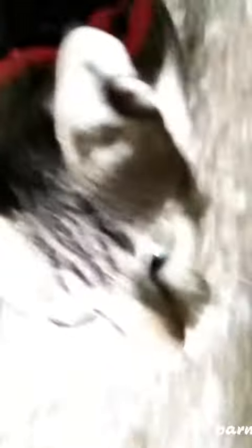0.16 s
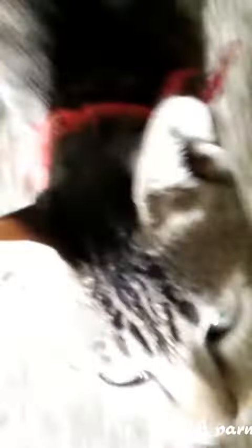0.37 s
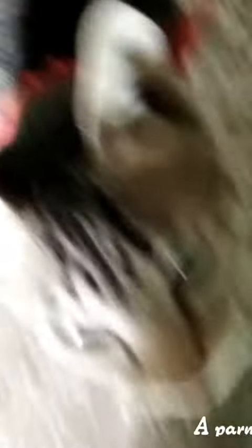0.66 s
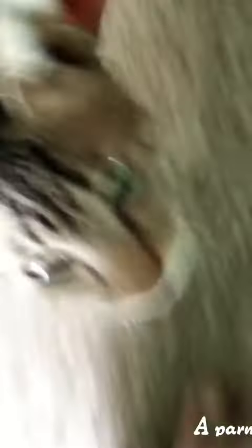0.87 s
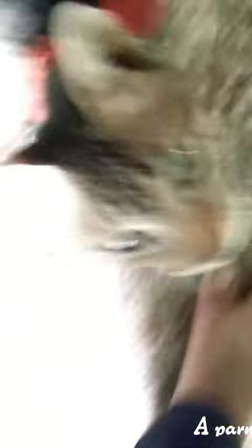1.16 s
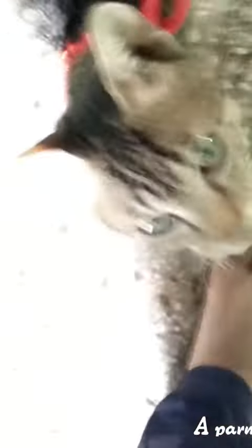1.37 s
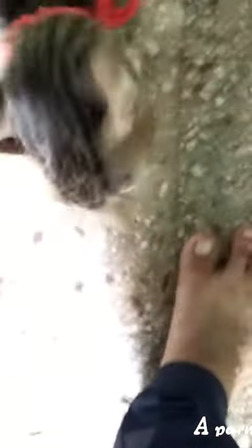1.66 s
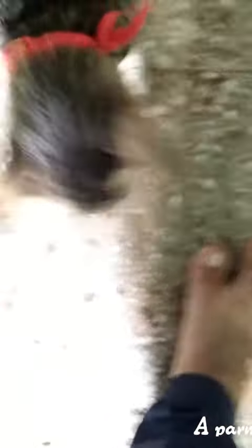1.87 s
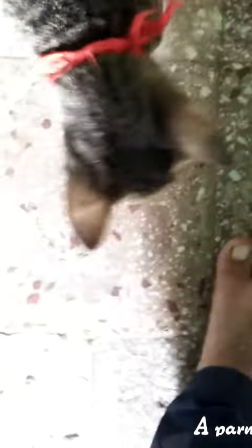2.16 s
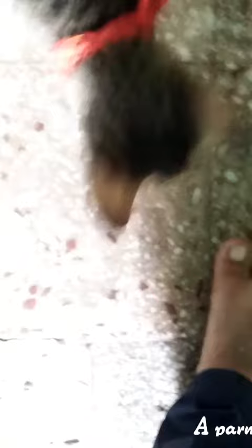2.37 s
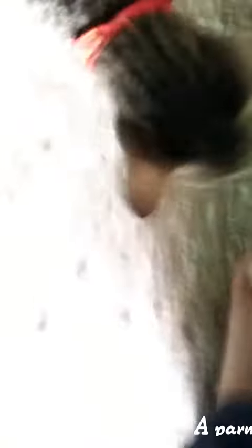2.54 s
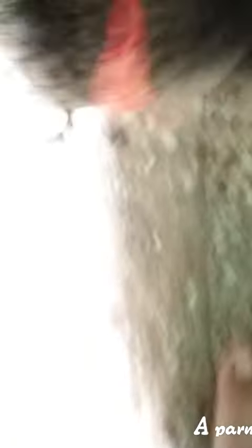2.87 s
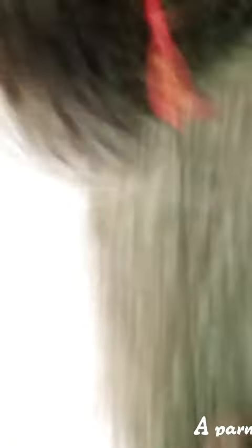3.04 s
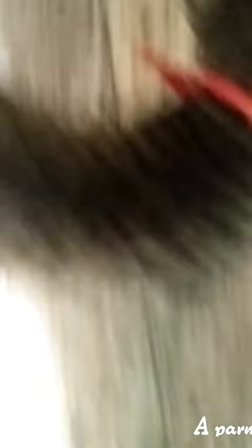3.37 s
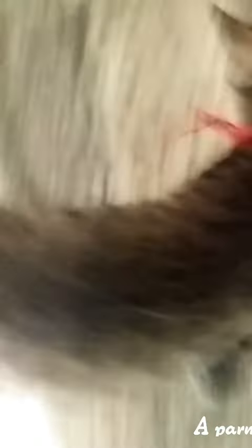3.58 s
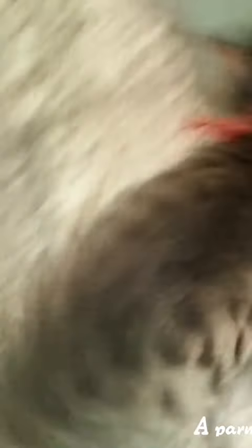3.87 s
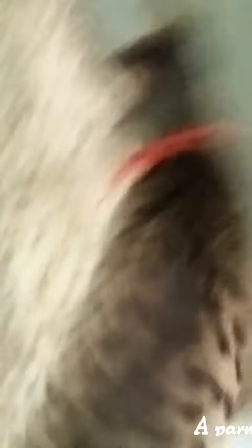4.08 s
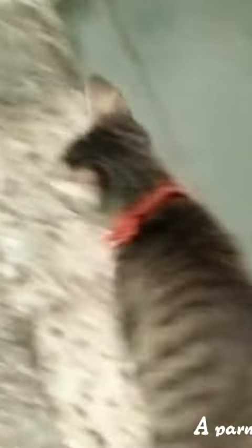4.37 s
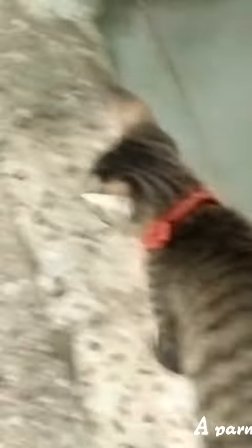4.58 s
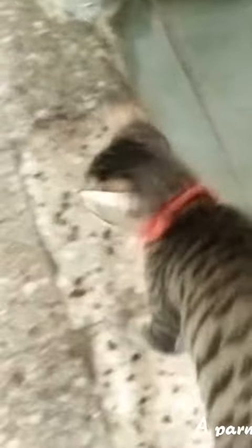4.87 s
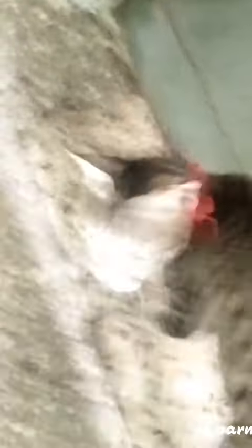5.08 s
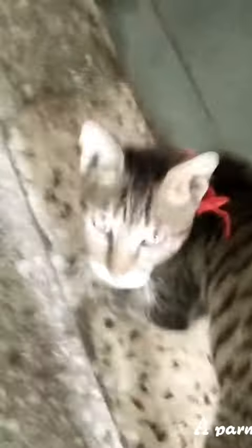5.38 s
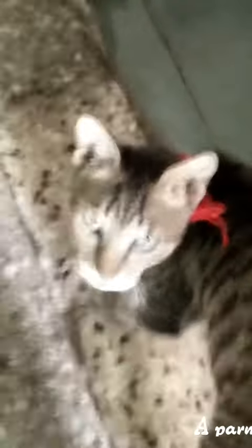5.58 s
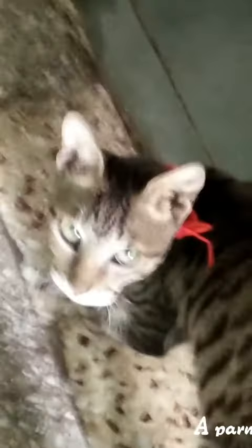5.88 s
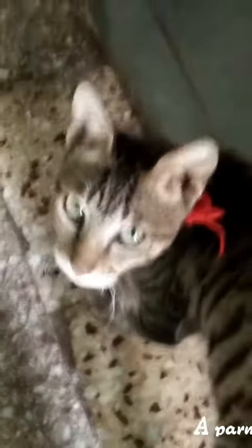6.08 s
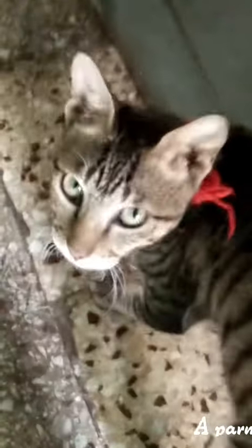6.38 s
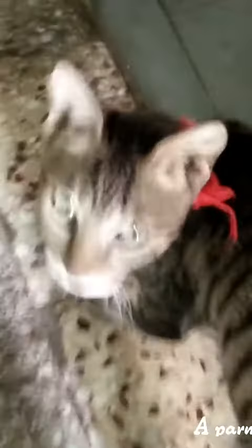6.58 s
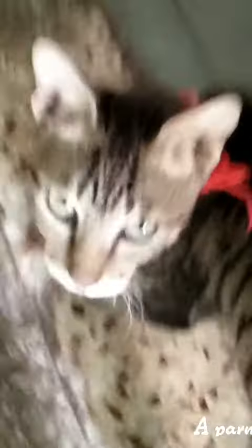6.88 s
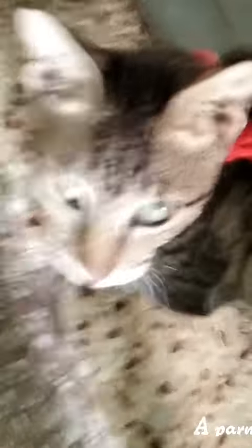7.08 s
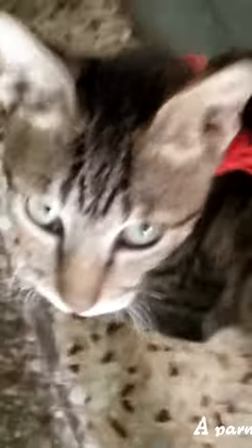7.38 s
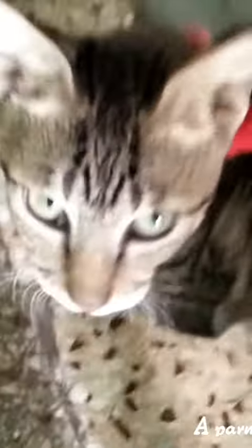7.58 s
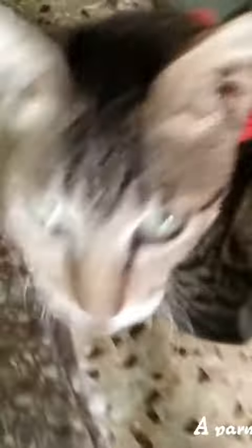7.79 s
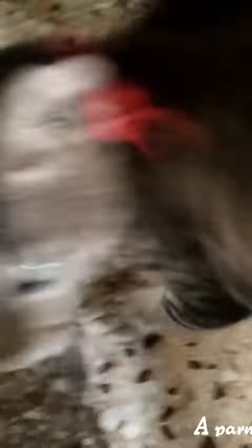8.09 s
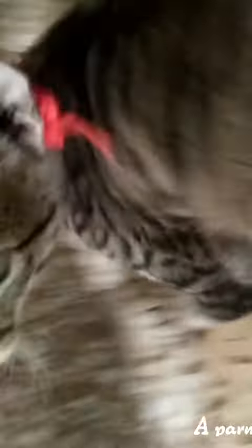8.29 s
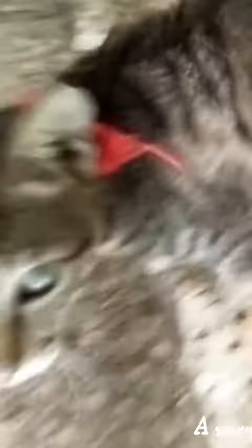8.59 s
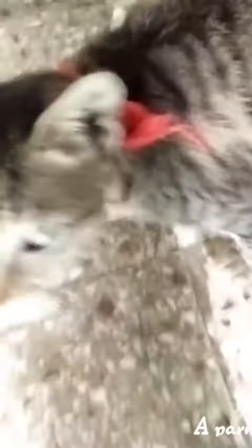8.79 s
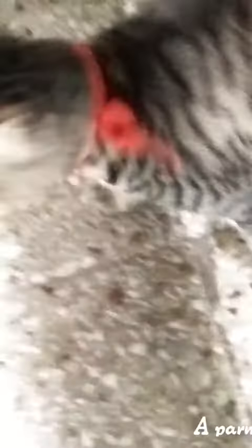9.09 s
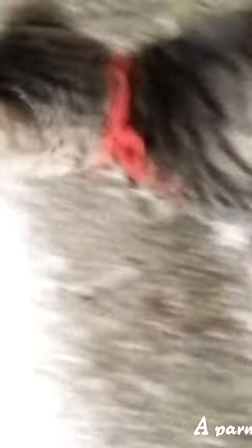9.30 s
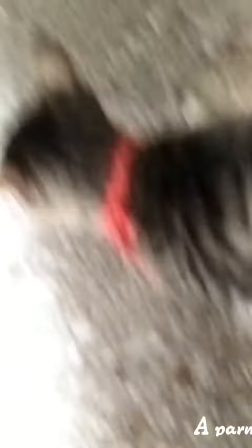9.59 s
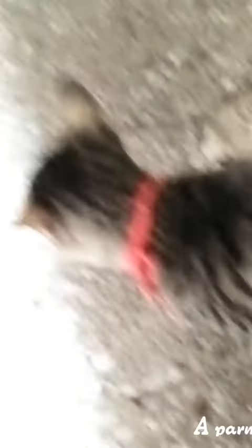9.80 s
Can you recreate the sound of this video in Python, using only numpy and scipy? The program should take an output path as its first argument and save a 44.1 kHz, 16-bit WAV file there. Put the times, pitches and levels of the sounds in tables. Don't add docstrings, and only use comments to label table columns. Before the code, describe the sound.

Irregular dull thumps and sharp claw ticks as a kitten bumps a phone microphone, in bursts with low rumble, faint hiss and near-silent crackle between.

```python
import sys
import numpy as np
from scipy import signal
from scipy.fft import rfft, irfft
from scipy.io import wavfile
from scipy.ndimage import uniform_filter1d

SR = 44100
rng = np.random.default_rng(int(sys.argv[2]) if len(sys.argv) > 2 else 0)


def output_pcm(signal):
    pcm = np.clip(np.atleast_2d(signal).T, -1, 1) * 32767
    wavfile.write(sys.argv[1], SR, np.round(pcm).astype(np.int16))


def decibels_to_gain(level_db):
    exponent = np.asarray(level_db, float) / 20
    return 10 ** exponent


N = 437913


def evened(x):
    return x / np.sqrt(np.mean(x ** 2) + 1e-20)


def add(mix, start_s, sound):
    at = round(start_s * SR)
    sound = sound[max(-at, 0):]
    part = mix[max(at, 0):][:len(sound)]
    part += sound[:len(part)]


def follow(x, time_s):
    keep = np.exp(-1 / (time_s * SR))
    return signal.lfilter([1 - keep], [1, -keep], x)


def coloured(spectrum):
    freq_hz, level_db = np.transpose(spectrum)
    hz = np.fft.rfftfreq(N, 1 / SR)
    gain = decibels_to_gain(np.interp(np.log(hz + 1), np.log(freq_hz), level_db))
    return evened(irfft(rfft(rng.standard_normal(N)) * gain, N))


def pressure_step(ms, rise_ms):
    return .5 + .5 * np.tanh(ms / max(rise_ms, .06))


# freq_hz, q (resonance, no unit)
LOW_CUT_STAGES = [(54.1, 1.8), (117.8, 0.93), (30, 1.8)]


def low_cut(x):
    for freq_hz, q in LOW_CUT_STAGES:
        w = 2 * np.pi * freq_hz
        b, a = signal.bilinear([1, 0, 0], [1, w / q, w * w], SR)
        x = signal.lfilter(b, a, x)
    return x


# start_s, peak_db, rise_ms
KNOCKS = [(0.0508, -15.5, 0.39), (0.1727, -19.5, 0.33), (0.6998, -23.5, 0.4), (1.6657, -9.5, 0.35),
          (1.7304, -28, 0.1), (2.7581, -9.5, 0.39), (2.7924, -20.5, 0.52), (2.831, -17, 0.47),
          (3.149, -33.5, 0.37), (3.2818, -15.5, 0.47), (3.3778, -16.5, 0.41), (3.5163, -19, 0.47),
          (3.6849, -12, 0.43), (3.7975, -15, 0.51), (3.9174, -18.5, 0.26), (4.1693, -4.5, 0.27),
          (4.229, -9, 0.3), (4.2617, -25, 0.47), (5.964, -0.5, 0.32), (6.1361, -2, 0.22),
          (6.4117, -6, 0.23), (6.4332, -22.5, 0.43), (6.574, -7, 0.26), (6.632, -20, 0.37),
          (6.685, -13, 0.33), (6.7028, -18, 0.47), (6.8033, -19.0, 0.38), (6.8082, -20.5, 0.47),
          (6.8187, -26.5, 0.51), (7.2333, -16.5, 0.4)]
# start_s, peak_db, rise_ms
PAW_TAPS = [(0.0183, -23.5, 0.58), (0.0804, -22, 0.63), (0.09, -24, 0.69), (0.1649, -23.5, 0.63),
            (0.3422, -38.5, 0.84), (0.814, -33, 0.95), (0.8913, -36.5, 0.9), (0.9461, -24.5, 0.93),
            (1.5587, -27, 1), (2.4894, -52, 1), (3.2865, -16.5, 0.91), (3.326, -35, 0.54),
            (3.5213, -23.5, 0.54), (3.6664, -37, 0.91), (3.7308, -18.5, 0.63), (3.7499, -16.5, 0.63),
            (3.8125, -18, 0.68), (3.8452, -40.5, 0.58), (4.7953, -31.5, 0.85), (4.8956, -33.5, 0.97),
            (5.6053, -24, 0.73), (5.6308, -19.5, 0.69), (5.9772, -15, 0.84), (6.12, -22.0, 0.84),
            (6.381, -24.5, 0.84), (6.4212, -17, 0.91), (6.6928, -20.0, 0.63), (6.7841, -22.5, 0.54),
            (7.3241, -33.5, 0.84), (7.6607, -23, 0.6)]
# start_s, peak_db, rise_ms
LEANS = [(0.0162, -37.5, 2.3), (0.93, -26.5, 3.17), (1.2782, -25.5, 3.5), (1.3603, -19, 1),
         (2.3473, -51.5, 3.17), (2.712, -40.5, 2.74), (3.8322, -33.5, 2.04), (4.156, -25.5, 3.68),
         (4.2821, -38.5, 2.36), (4.5344, -50, 3.68), (4.6039, -51, 3.68), (5.0769, -35.5, 2.74),
         (5.1176, -40.5, 1.4), (5.1879, -36.5, 1.52), (5.299, -37.5, 1.31), (5.5655, -44.0, 3.17),
         (6.38, -27.5, 2.5), (6.6436, -28.5, 3.1), (7.1381, -41.5, 3.68), (7.2634, -40.5, 3.68),
         (7.9866, -35.0, 3.17), (8.2701, -55, 3), (8.7912, -47, 2.04), (9.3307, -53.5, 3.68)]
# start_s, peak_db, rise_ms
RELEASES = [(0.0198, -20, 0.94), (0.0822, -19, 1), (0.1021, -33, 0.52), (0.1661, -23.5, 0.79),
            (0.2706, -32.5, 0.65), (0.4064, -28, 0.74), (1.0972, -22, 0.71), (1.3343, -26.5, 0.54),
            (1.3804, -33.5, 1), (1.4542, -30, 0.56), (1.5261, -18, 0.55), (1.5391, -21.5, 0.63),
            (1.9443, -8.5, 0.31), (1.9838, -45, 0.35), (2.0312, -28.5, 0.61), (2.5855, -16.5, 0.51),
            (2.9144, -14.5, 0.42), (2.9704, -19, 0.48), (3.7449, -25, 0.88), (3.8455, -46, 0.44),
            (3.9328, -31, 0.82), (4.0115, -46.5, 0.17), (4.3714, -36, 0.6), (5.3508, -40.5, 0.53),
            (5.9637, -6.5, 0.44), (6.9941, -29.5, 0.43), (7.4062, -50.5, 0.94), (7.4945, -32.5, 1)]
# start_s, peak_db, rise_ms
EASES = [(0.053, -23.5, 1.76), (0.5985, -42.5, 3.68), (0.8323, -36.0, 3.68), (1.0047, -38, 3.17),
         (1.132, -43.5, 3.68), (2.109, -50, 3.4), (2.7479, -23, 2.9), (2.7855, -23.5, 3.17),
         (3.1943, -43.5, 1.13), (3.6083, -30.5, 1.31), (3.709, -37.5, 2.04), (3.7202, -20.5, 1.13),
         (4.097, -39.5, 3.68), (4.362, -40, 3.68), (4.8641, -39, 1.31), (5.3444, -40.5, 1.3),
         (5.353, -31.0, 3.68), (5.3786, -38, 1.31), (5.4192, -29.5, 1.2), (5.4881, -38.5, 2.04),
         (5.6277, -28.5, 3.17), (5.8469, -20, 2.36), (6.0069, -38.5, 3.68), (6.582, -27, 3.17),
         (6.6181, -20, 2.36), (6.7279, -30, 1.76), (6.765, -18.5, 2.04), (8.6941, -43.5, 1.55),
         (8.6976, -36, 3.68), (8.8021, -34, 4.6)]
# start_s, peak_db, rise_ms
NUDGES = [(.004, -37.5, 2.5), (.546, -53.5, 3.5), (1.033, -48, 3.5), (1.1765, -41, .75), (1.247, -46, 2.5),
          (3.845, -38.5, .65), (5.254, -50, 2.2), (5.464, -51, 2.5), (5.74, -46, 3.5), (5.8, -46, 3.5),
          (5.92, -51, 3.0), (6.772, -39, .5), (6.953, -48, 3.5), (7.037, -49, 3.5), (7.128, -52.5, .5),
          (7.168, -48, 3.5), (7.197, -52, 2.5), (7.362, -46.5, 3.5), (7.423, -47.5, 3.5),
          (7.559, -49.5, 3.5), (7.737, -44, 1.2), (7.77, -56, 1.5), (7.832, -44, 2.5), (7.987, -47, 1.1),
          (8.03, -49.5, 3.5), (8.35, -60, 3.5), (8.549, -56, 3.5), (8.664, -55.5, 3.5), (9.3, -61, 2.5),
          (9.36, -58, 3.5)]


def thump(rise_ms, lead):
    edge, quicker = 0.22, 1.8
    ms = (np.arange(4096) - lead) / SR * 1000
    push = (1 - edge) * pressure_step(ms, rise_ms)
    quick_edge = edge * pressure_step(ms + .5 * rise_ms, rise_ms / quicker)
    first_catch = .012 * pressure_step(ms + rise_ms, .8)
    fade = decibels_to_gain(-0.14 * np.maximum(ms - 12, 0))
    sound = fade * low_cut(push + quick_edge + first_catch)
    return sound / abs(sound).max()


def jolts():
    out = np.zeros(N)
    lead = 1024
    for chance_up, table in ((0, KNOCKS + PAW_TAPS + LEANS), (1, RELEASES + EASES), (.5, NUDGES)):
        sides = np.sign(chance_up - rng.random(len(table)))
        for (start_s, peak_db, rise_ms), side in zip(table, sides):
            add(out, start_s - lead / SR, thump(rise_ms, lead) * decibels_to_gain(peak_db) * side)
    return out


# start_s, length_s, level_db
FUR_RUBS = [(.07, .06, -53.5), (0.922, 0.04, -65), (1.329, .05, -55), (1.533, .04, -54), (2.746, .06, -52),
            (3.7, .06, -52.5), (3.8, 0.046, -57.5), (4.36, .03, -59), (5.069, .03, -67.5), (5.29, .05, -64),
            (5.335, .06, -52), (6.617, .04, -48.5), (6.685, .075, -52), (6.755, .04, -48),
            (7.029, .12, -67.5), (7.965, .05, -70)]


def scuffs(jolting):
    slips_per_s, spread_db, rise_ms = 750, 3.5, .42
    chance, size, side = rng.random((3, N))
    slips = (chance < slips_per_s / SR) * decibels_to_gain(-spread_db * np.log(size + 0.0063)) * np.sign(side - .5)
    slip_shape = np.diff(pressure_step(np.arange(-128, 128) / SR * 1000, rise_ms))
    grains = evened(low_cut(signal.oaconvolve(slips, slip_shape)[:N]))
    level = decibels_to_gain(-39.5) * signal.lfilter([.004], [1, -.996], abs(jolting))
    for start_s, length_s, level_db in FUR_RUBS:
        add(level, start_s, decibels_to_gain(level_db) * np.hanning(round(length_s * SR)))
    return grains * level


# start_s, level_db, width_ms, side (+1 outward or -1 inward)
CLAW_TICKS = [(.592, -50.5, 0.29, 1), (1.6654, -24, .07, 1), (1.9441, -21.5, 0.044, -1),
              (2.585, -41, 0.11, -1), (2.7585, -39, .1, 1), (3.282, -50, 0.091, -1),
              (3.517, -44.5, 0.14, -1), (3.918, -44, 0.14, 1), (4.1685, -33.5, 0.12, -1),
              (4.2286, -38, .12, -1), (4.371, -49, .14, -1), (5.4195, -41, 0.14, -1), (5.847, -43, 0.29, 1),
              (5.9637, -12, 0.03, 1), (6.1358, -24, 0.032, -1), (6.3813, -38, 0.29, -1),
              (6.4114, -37, 0.26, -1), (6.5736, -19, .04, 1), (6.619, -40, .17, 1),
              (6.632, -45.5, 0.072, 1), (6.769, -47, .17, 1), (6.9937, -41.5, 0.085, -1),
              (7.661, -58.5, 0.037, 1)]


def claw_ticks():
    out, ms = np.zeros(N), np.arange(-64, 64) / SR * 1000
    for start_s, level_db, width_ms, side in CLAW_TICKS:
        push = np.exp(-.5 * (ms / width_ms) ** 2)
        add(out, start_s - 64 / SR, np.sign(side) * decibels_to_gain(level_db) * push)
    return out


# start_s, level_db, pitch_hz, t60_s
PART_RINGS = [
    (2.83, -65.5, 2200, .06),
    (2.913, -64, 5900, 0.016),
    (2.918, -66, 2150, .14),
    (2.972, -71.5, 1800, 0.044),
    (3.15, -76.5, 1400, .35),
    (3.3, -66.5, 2100, 0.052),
    (4.229, -55.5, 6000, 0.014),
]


def part_rings():
    out, t = np.zeros(N), np.arange(4096) / SR
    for start_s, level_db, pitch_hz, t60_s in PART_RINGS:
        add(out, start_s, decibels_to_gain(level_db - 60 * t / t60_s) * np.sin(2 * np.pi * pitch_hz * t))
    return out


# time_s, rumble_db
GRIP_LEVEL = [(0, -63.5), (0.202, -73), (.5, -65), (1.0, -56), (1.5, -60), (2.0, -72.5), (2.4, -77),
              (3.1, -64), (4.2, -60), (4.7, -66), (5.3, -56), (5.8, -58), (6.3, -70), (7.15, -56),
              (7.7, -66), (8.6, -63), (9.0, -72), (9.93, -71)]
# freq_hz, level_db (per Hz)
RUMBLE_SPECTRUM = [(15, 5), (60, -2.5), (120, -25.5), (250, -36), (500, -47.5), (1000, -74.5)]


def handling(jolting):
    lumpy_db, stir_db, settle_s = 4.5, -24, 0.014
    time_s, rumble_db = np.transpose(GRIP_LEVEL)
    grip = decibels_to_gain(np.interp(np.arange(N) / SR, time_s, rumble_db))
    stirred = decibels_to_gain(stir_db) * follow(abs(jolting), settle_s)
    lumps = evened(uniform_filter1d(uniform_filter1d(rng.standard_normal(N), 900), 900))
    level = (grip + stirred) * decibels_to_gain(lumpy_db * lumps - 6.0)
    return level * evened(low_cut(coloured(RUMBLE_SPECTRUM)))


# zero_hz, zero_width_hz, pole_hz, pole_width_hz
PORT_RESONANCES = [(3950, 39, 4043, 120), (4060, -700, 3890, 610)]


def port(x):
    for zero_hz, zero_width_hz, pole_hz, pole_width_hz in PORT_RESONANCES:
        zero = np.exp((2j * zero_hz - zero_width_hz) * np.pi / SR)
        pole = np.exp((2j * pole_hz - pole_width_hz) * np.pi / SR)
        b, a = np.poly([zero, zero.conj()]), np.poly([pole, pole.conj()])
        x = signal.lfilter(b * a.sum() / b.sum(), a, x)
    return x


# freq_hz, level_db (per Hz)
HISS_SPECTRUM = [(100, 0), (800, -13), (2000, -13.5), (5000, -16), (7600, -20.5), (8000, -17), (8400, -22),
                 (14000, -29)]


def hiss(dry):
    shut_db, share, hold_s = -66.0, 0.6, 0.0024
    level_db = 10 * np.log10(follow(dry ** 2, hold_s) + 1e-12)
    open_db = np.clip(share * (level_db - shut_db), -7.0, 24.5)
    return decibels_to_gain(-88.0 + open_db) * coloured(HISS_SPECTRUM)


def converter(x):
    edge_hz, step_size = 14350, 10 / 2 ** 15
    x = signal.sosfilt(signal.ellip(8, .5, 50, edge_hz, fs=SR, output="sos"), x)
    return step_size * np.floor(x / step_size)


def scene():
    jolting = jolts()
    return (jolting + scuffs(jolting) + claw_ticks() + part_rings() + handling(jolting))[None]


def top_cut(x):
    return signal.sosfilt(signal.butter(12, 14430, fs=SR, output="sos"), x)


def record(dry):
    mix = converter(port(dry) + hiss(dry))
    return top_cut(mix)


dry = scene()
out = record(dry)
output_pcm(out)
```